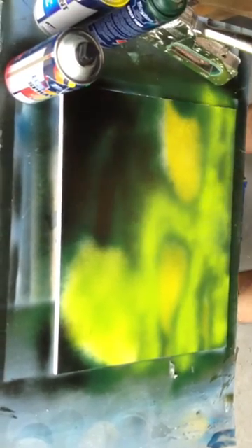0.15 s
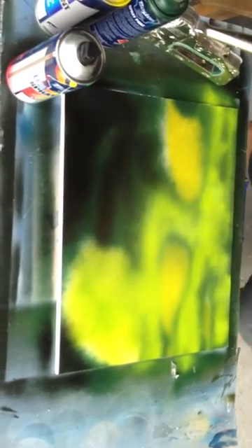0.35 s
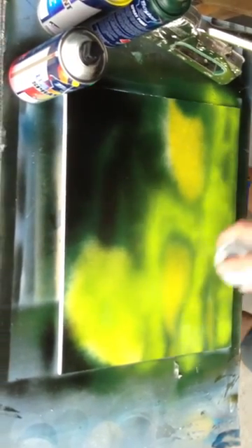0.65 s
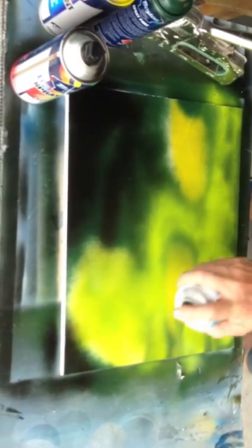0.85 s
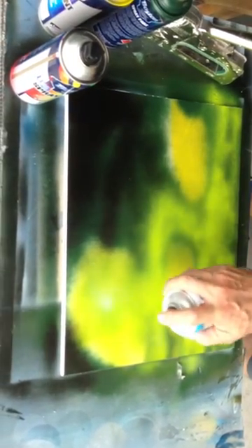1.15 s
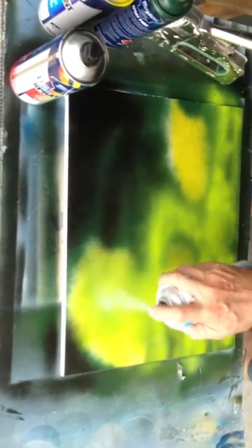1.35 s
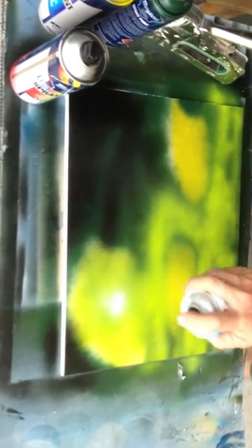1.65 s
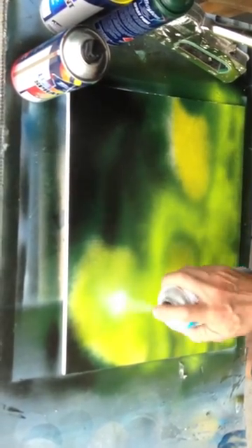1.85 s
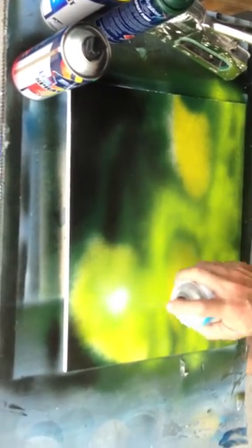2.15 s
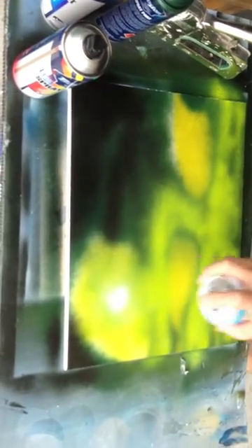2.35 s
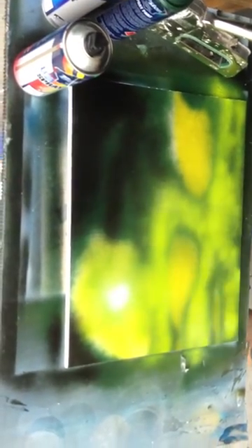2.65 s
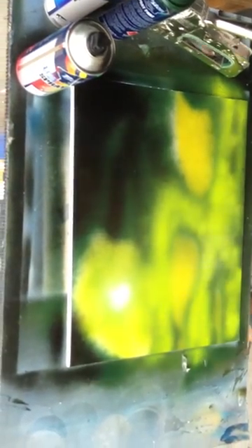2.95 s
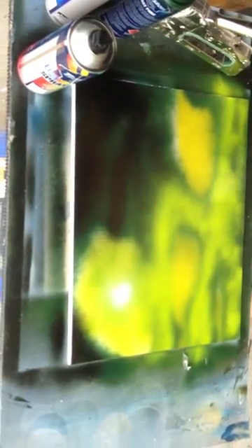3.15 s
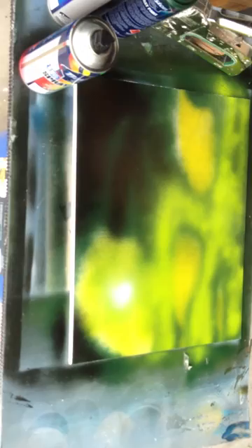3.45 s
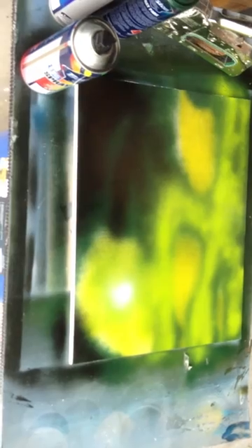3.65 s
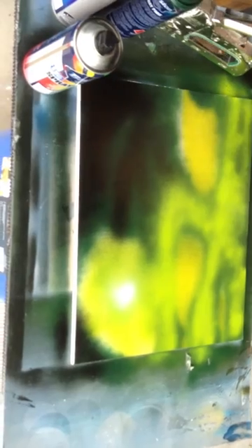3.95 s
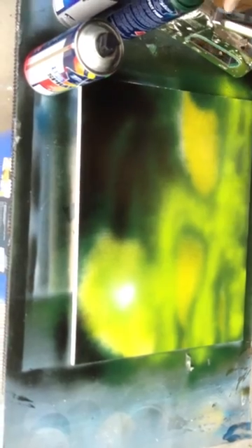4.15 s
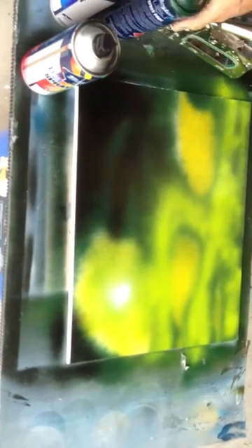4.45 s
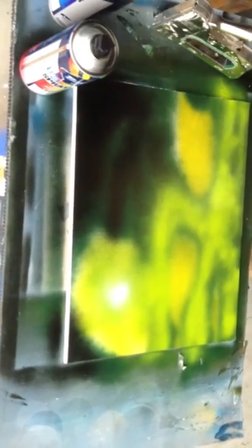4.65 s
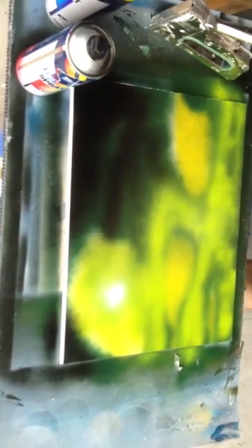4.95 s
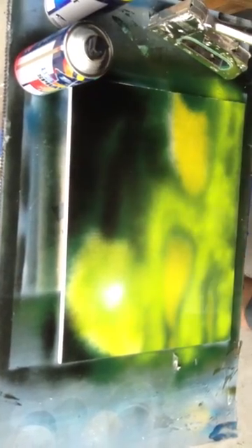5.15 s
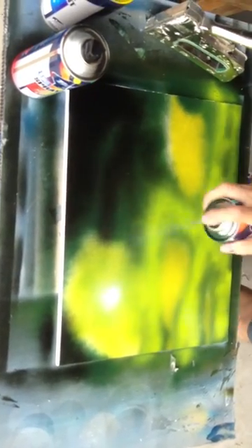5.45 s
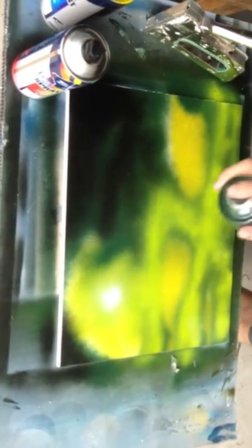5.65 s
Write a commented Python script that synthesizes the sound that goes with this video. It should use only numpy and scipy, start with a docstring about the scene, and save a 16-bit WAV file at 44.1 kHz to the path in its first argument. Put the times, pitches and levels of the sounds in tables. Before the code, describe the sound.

Metal cans clack and rattle, four faint short spray hisses follow, a can thumps onto a table, then more clacking and one stronger spray.

```python
"""Spray painting at a table

In a small room, close to the microphone, cans are picked up, swung and tapped: they clack as noise-struck
resonances with a ringing shell, rims clank and rub, and paint swishes as a fizz of noise grains.
The nozzle clicks in cap resonances and gives five short hisses of filtered, sputtering noise.
One can is put down with a thump of ringing board modes, the table bumps after it, and a can is picked up again."""
import sys
import numpy as np
from scipy import signal
from scipy.fft import rfft, irfft, next_fast_len
from scipy.io import wavfile
from scipy.ndimage import uniform_filter1d

SR = 44100
rng = np.random.default_rng(int(sys.argv[2]) if len(sys.argv) > 2 else 0)


def unload_audio(sound):
    """Save the sound as a 16-bit wav file, at the path given as the first command line argument."""
    columns = np.transpose(np.atleast_2d(sound))
    # keep every value between -1 and 1, then stretch to whole-number steps
    steps = np.round(np.clip(columns, -1, 1) * 32767)
    wavfile.write(sys.argv[1], SR, steps.astype(np.int16))


N = 256220
T = np.arange(N) / SR  # seconds
HIT_T = T[:SR // 2]  # the half second given to one blow

# Spray bursts. Each row: start in seconds, length in seconds, flow level in dB, cap resonance in dB over the flow,
# dB by which the finger eases off at both ends, time in seconds when a clot passes.
SPRAYS = [(0.989, 0.14, -44, -6, 19, 1.1), (1.348, 0.18, -40.5, -3, 12.5, 1.422),
          (1.773, 0.22, -40.5, -6, 19, 1.888), (2.176, 0.16, -44.5, -6.5, 1.5, 2.2),
          (5.459, 0.15, -31, -4, 8, 5.487)]


def undb(db):
    """Decibels to gain."""
    return 10 ** (np.asarray(db) / 20)


def unit(x):
    """Scale to rms 1."""
    return x / np.sqrt(np.mean(x ** 2))


def unit_hit(x):
    """Scale a blow so that its loudest 3 ms have rms 1."""
    return x / np.sqrt(uniform_filter1d(x ** 2, size=132).max())


def add(track, s, x):
    """Mix a sound into the track at time s."""
    start = int(s * SR)
    track[start:start + len(x)] += x[:N - start]


def lowpass(x, hz):
    """Take off the treble above a corner, 12 dB per octave."""
    return signal.sosfilt(signal.butter(2, hz, fs=SR, output="sos"), x)


def colour(x, points):
    """Causal minimum-phase filter with a (Hz, dB) response."""
    size = 2 * next_fast_len(len(x) // 2 + 2048, True)
    hz, db = np.transpose(points)
    bin_hz = np.arange(size // 2 + 1) * SR / size
    log_gain = np.log(undb(np.interp(np.log(bin_hz + 1), np.log(hz), db)))
    # folding the cepstrum onto positive time makes the filter causal
    cepstrum = irfft(log_gain)
    cepstrum[1:size // 2] *= 2
    cepstrum[size // 2 + 1:] = 0
    response = np.exp(rfft(cepstrum))
    return irfft(rfft(x, size) * response)[:len(x)]


def resonate(x, modes):
    """Parallel resonances (Hz, width in Hz, dB) of alternating sign."""
    out = 0
    for k, (hz, width, db) in enumerate(modes):
        b, a = signal.iirpeak(hz, hz / width, SR)
        out = out + (-1) ** k * undb(db) * signal.lfilter(b, a, x)
    return out


def ring(modes):
    """Free ringing of (Hz, dB, t60 in s) modes; each blow weights and detunes them anew."""
    hz, db, t60 = np.transpose(modes)[:, :, None]
    weight, detune = rng.standard_normal((2, len(modes), 1))
    phase = (2 * np.pi * hz * (1 + .003 * detune) * HIT_T).astype(np.float32)
    decay = np.exp(-np.log(1000) / t60 * HIT_T)
    return unit_hit(np.sum(undb(db + 1.5 * weight) * np.sin(phase) * decay, axis=0))


def walk(rate):
    """Smooth random wander with a spread near 1, through a new value `rate` times a second."""
    knots = rng.standard_normal(4096)
    return np.interp(T * rate, np.arange(len(knots)), knots)


def contact(decay_s, scatter_db, scatter_s):
    """A hard contact chatters for a moment, then scatters off the things nearby."""
    t = HIT_T[:8192]
    envelope = np.exp(-t / decay_s) + undb(scatter_db) * np.exp(-t / scatter_s)
    return rng.standard_normal(len(t)) * envelope


def air():
    """Quiet, even room noise."""
    # Spectrum of the room noise. Each row: frequency in Hz, relative dB per Hz.
    air_spectrum = [(60, -7), (140, -5.5), (260, -8.5), (490, -11), (900, -11.5), (1300, -16),
                    (2700, -15.5), (5000, -27), (7400, -25.5), (15500, -34)]
    return unit(colour(rng.standard_normal(N), air_spectrum)) * undb(-61)


def motion():
    """How briskly the can moves: each swing builds up, holds and dies away."""
    # Swings of a can, as paint washes about and the hand slides over it.
    # Each row: start of the hold in seconds, hold in seconds, level in dB.
    swing_rows = [(0.28, 0.2, -50), (0.632, 0.17, -45.5), (2.486, 0.31, -67.5), (2.932, 0.0093, -47),
                  (3.174, 0.23, -53), (3.439, 0.045, -45), (4.03, 0.18, -65.5), (4.403, 0.2, -77.5),
                  (5.035, 0.18, -53), (5.259, 0.2, -41)]
    rise_db_per_s, fall_db_per_s = 134.5, 82
    swings = []
    for s, hold, db in swing_rows:
        rise = rise_db_per_s * np.maximum(s - T, 0)
        fall = fall_db_per_s * np.maximum(T - s - hold, 0)
        swings.append(db - rise - fall)
    return undb(np.max(swings, axis=0))


def rolling(moving):
    """The rolling ball's light random clacks, whose level follows the motion of the can."""
    per_s, over_motion_db, centre_hz, tick_db = 14, 4.5, 2030, -5
    chance = rng.random((100, 3))
    times = np.cumsum(0.5 + chance[:, 0]) / per_s
    moving_db = 20 * np.log10(np.interp(times, T, moving))
    levels = moving_db + over_motion_db + 6 * (chance[:, 1] - .5)
    resonances = centre_hz * 2 ** (.5 * (chance[:, 2] - .5))
    heard = (levels > -58) & (times < T[-1])
    return [(s, db, hz, tick_db) for s, db, hz in zip(times[heard], levels[heard], resonances[heard])]


def shaded(x, s):
    """Dull the top of a clack that sounds while a can is put away, off to the side."""
    away_from_s, away_to_s, away_hz = 2.6, 3.6, 10500
    if away_from_s < s < away_to_s:
        return lowpass(x, away_hz)
    return x


def clacks(moving):
    """Ball, can or fingers tap a can wall; paint damps most of the ring and shifts the main resonance."""
    # Clacks of the cans: the ball on the wall, a can tapped by another can or by fingers.
    # Each row: start in seconds, level in dB before the trims below, wall resonance in Hz,
    # bright tick in dB relative to the wall.
    clack_rows = [ (0.1245, -33, 1800, -6.5), (0.1553, -30, 1680, 0.5), (0.2087, -26.5, 1720, -8.5),
                  (0.2278, -25.5, 1720, -12), (0.3112, -25.5, 2160, -10), (0.33, -27, 2130, -20),
                  (0.3762, -12.5, 2470, -9.5), (0.3835, -17, 2540, -1), (0.3866, -19.5, 2300, -17),
                  (0.4067, -26, 2300, -20), (0.4313, -23, 2290, -6), (0.597, -33.5, 2450, -11),
                  (0.6276, -27.5, 1580, -7.5), (0.7123, -27, 2410, -8.5), (0.7644, -27.5, 1600, -14.5),
                  (2.7441, -18.5, 2410, -4.5), (2.7609, -16, 2300, 1), (2.8486, -22.5, 2450, -7.5),
                  (2.882, -25, 1980, -11), (2.9524, -29, 1970, -12), (2.9764, -31.5, 2230, -7),
                  (3.058, -37.5, 1950, -6), (3.0929, -33, 2470, 0), (3.1683, -28, 2290, -4.5),
                  (3.265, -31.5, 1970, -9.5), (3.3092, -18.5, 1510, -12), (4.3983, -51, 2350, -9),
                  (4.907, -31.5, 1460, -8), (4.918, -19.5, 2170, -12), (4.9853, -14, 2820, -11),
                  (5.0032, -20, 3080, -11.5), (5.0543, -28, 2240, -12), (5.102, -17.5, 2200, -9),
                  (5.161, -26, 1740, -10), (5.173, -31, 1800, -23), (5.2199, -28.5, 1960, -10),
                  (5.2485, -25.5, 1904, -22), (5.2588, -19, 2160, -9.5)]
    # Damped modes of a filled can: low knock, wall, bright tick. Each row: frequency in Hz, width in Hz, level in dB.
    low_modes = [(467, 630, -8), (1000, 210, 3)]
    wall_modes = [(1609, 340, 2), (2294, 530, 1.5), (3036, 150, 1.5), (3480, 280, -3), (4140, 510, -9)]
    tick_modes = [(6190, 1950, -5), (6600, 950, 1), (7800, 1100, -3.5), (11700, 1100, -9.5),
                  (13800, 4800, -14)]
    # Lasting modes of the steel shell. Each row: frequency in Hz, mean level in dB, t60 in seconds.
    shell_modes = [(1808, -2, 0.4), (1926, -3, 0.22), (2186, -7, 0.51), (2550, -9, 0.14), (3100, -11.5, .3),
                   (3480, -13, 0.27), (4580, -14.5, 0.24), (7070, -5, 0.23), (7250, -10.5, .2),
                   (8050, -1, 0.074)]
    # Shell ring after a clack, which a firm grip damps. Each row: time in seconds, level in dB before the trim below.
    shell_ring = [(0.16, 18), (0.4, 8), (0.7, 2), (2.75, 17), (3.0, 10.5), (4.92, -7), (5.26, -7)]
    # a blow on the soft side wall stirs low knock and all wall modes; on the stiff rim one resonance is left
    knock_db, other_walls_db = -16.5, -3
    rim_hz, rim_db_per_octave = 2414, 81
    near, far = np.zeros((2, N))
    for s, db, hz, tick_db in list(clack_rows) + rolling(moving):
        rim_db = rim_db_per_octave * max(np.log2(hz / rim_hz), 0)
        ring_db = np.interp(s, *np.transpose(shell_ring))
        # faint clacks are farther away, so more of them is room
        room_db = 2 - 0.12 * (db + 29.5)
        push = contact(decay_s=0.0028, scatter_db=-25.5, scatter_s=.014)
        main = unit_hit(resonate(resonate(push, [(hz, 420, 0)]), [(hz, 800, 0)]))
        others = unit_hit(resonate(contact(0.0058, -18.5, .018), wall_modes))
        wall = unit_hit(main + undb(other_walls_db - rim_db) * others)
        low = unit_hit(lowpass(resonate(contact(0.0023, -21.0, 0.0033), low_modes), 1400))
        tick = unit_hit(resonate(contact(0.0034, -12.5, 0.029), tick_modes))
        mix = wall + undb(knock_db - rim_db) * low + undb(tick_db) * tick
        hit = shaded(undb(db - 4.5) * mix, s)
        add(near, s, hit)
        add(near, s, undb(db + ring_db - 33.0) * ring(shell_modes))
        add(far, s, undb(room_db) * hit)
    return near, far


def clanks():
    """Rim meets rim: a bright crack, then the crowded modes of two steel shells chatter and die away."""
    # Can striking can. Each row: start in seconds, level in dB, ring in dB relative to the crack.
    clank_rows = [(0.2374, -11, -12.5), (0.2697, -21.5, -12), (0.2939, -22.5, -25)]
    # Colour of the clank. Each row: frequency in Hz, relative dB per Hz.
    steel = [(400, -31), (1000, -22.5), (1300, -28.5), (1750, 0.5), (2200, -6), (3300, 2), (4300, -4.5),
             (5300, -7), (6300, -6.5), (8000, -10), (10500, -18.5), (14500, -14)]
    out = np.zeros(N)
    for s, db, ring_db in clank_rows:
        crack = np.exp(-HIT_T / 0.0048)
        chatter_db = 1.6 * walk(220)[:len(HIT_T)]
        shells = undb(ring_db + chatter_db) * np.exp(-HIT_T / 0.046)
        noise = rng.standard_normal(len(HIT_T))
        add(out, s, undb(db) * unit_hit(colour(noise * (crack + shells), steel)))
    return out


def swish(moving):
    """Washing paint and sliding skin: a dense fizz of tiny impacts on the can wall."""
    # Spectrum of the fizz. Each row: frequency in Hz, relative dB per Hz.
    fizz = [(120, -46.5), (200, -35), (278, -12.5), (446, -8.5), (641, -15), (992, -6), (1230, -10),
            (1650, -3), (2290, -2), (2470, -1), (3300, -6), (4920, -20.5), (7090, -16.5), (14400, -30),
            (15500, -37.5)]
    grains = rng.standard_normal(N) * undb(2.4 * rng.standard_normal(N))
    return moving * unit(colour(grains, fizz)) * undb(1.7 * walk(90))


def rubs():
    """Steel sticks and slips on steel; the dense slips feed one resonance of the shell."""
    # A rim rubs and sings briefly. Each row: start and length in seconds, pitch and width in Hz, level in dB.
    rub_rows = [(0.321, 0.058, 2100, 200, -40.5), (2.768, 0.038, 1774, 90, -32.5),
                (3.996, 0.28, 4120, 450, -74.5), (4.846, 0.028, 685, 615, -59),
                (4.927, 0.065, 2200, 255, -50), (4.992, 0.087, 4050, 500, -48.5)]
    out = np.zeros(N)
    for s, length, hz, width, db in rub_rows:
        slips = rng.standard_normal(len(HIT_T[:int(length * SR)]))
        song = resonate(resonate(slips, [(hz, width, 0)]), [(hz, 2 * width, 0)])
        add(out, s, undb(db) * unit(song * signal.windows.tukey(len(slips), .5)))
    return out


def nozzle():
    """The plastic cap ticks as the valve is pressed and let go."""
    # Clicks of the nozzle under the finger. Each row: start in seconds, level in dB before a common 4 dB cut,
    # bright tick in dB relative to the cap.
    clicks = [(1.0096, -31, 0), (1.1545, -33, -1), (1.4753, -36.5, 2), (1.5313, -46, 2.5),
              (1.6097, -46.5, -23), (1.6663, -37.5, -4), (1.8552, -39.5, 8), (2.0425, -44.5, 2.5),
              (2.0527, -53, 6), (2.1916, -44, 10.5), (5.6431, -38, -1)]
    # Bright modes of the cap. Each row: frequency in Hz, width in Hz, level in dB.
    tick_modes = [(5890, 1100, 17.5), (6900, 1940, 18), (12400, 4900, -8)]
    cap_hz, cap_spread = 2510, 0.085  # the spread is a share of the pitch, drawn anew for each click
    # the valve also ticks as each burst starts
    presses = [(burst[0], -47.5, -16) for burst in SPRAYS]
    out = np.zeros(N)
    for s, db, tick_db in list(clicks) + presses:
        hz = cap_hz * (1 + cap_spread * rng.standard_normal())
        push = contact(decay_s=0.0018, scatter_db=-47.5, scatter_s=0.0071)
        cap = unit_hit(resonate(push, [(hz, 550, 0), (1700, 400, -9)]))
        tick = unit_hit(resonate(push, tick_modes))
        add(out, s, undb(db - 4) * (cap + undb(tick_db) * tick))
    return out


def valve_opening(start, length, ease_db):
    """The valve snaps open, follows the arch of the finger's pressure and closes."""
    open_s, close_s, flatness = 0.0056, 0.013, 3.3
    t = np.maximum(T - start, 0)
    off_centre = np.abs(2 * np.minimum(t / length, 1) - 1)
    arch = undb(-ease_db * off_centre ** flatness)
    return (1 - np.exp(-t / open_s)) * arch * np.exp(-np.maximum(t - length, 0) / close_s)


def spray():
    """The jet hisses high up and rushes on the paper; sputtering paint sounds the resonances of the cap."""
    # Spectrum of the jet. Each row: frequency in Hz, relative dB per Hz.
    jet_spectrum = [(2060, -49), (3500, -14), (4870, -26.5), (5830, -15), (6320, -10), (7160, -11),
                    (7960, -7.5), (8850, -9), (10300, -14.5), (11900, -10.5), (13900, -1.5), (14800, -8),
                    (15500, 0)]
    clot_db, clot_width_s = 8, 0.017  # a clot of paint makes the cap sputter harder for a moment
    sputter_power = 0.79  # sputter grows more slowly than the flow, so a half-open valve spits more
    flow, sputter = np.zeros((2, N))
    for start, length, db, cap_db, ease_db, clot_s in SPRAYS:
        opening = valve_opening(start, length, ease_db)
        clot = np.exp(-((T - clot_s) / clot_width_s) ** 2)
        flow += undb(db) * opening
        sputter += undb(db + cap_db + clot_db * clot) * opening ** sputter_power
    jet = unit(colour(rng.standard_normal(N), jet_spectrum)) * undb(2.5 + 1.35 * walk(140))
    cap = resonate(rng.standard_normal(N), [(1684, 170, -2.5), (2423, 144, 3.0), (2830, 130, -0.5)])
    cap = unit(resonate(cap, [(2570, 1900, 0)])) * undb(-7.0 + 1.9 * walk(180))
    paper = unit(resonate(rng.standard_normal(N), [(970, 480, 0)]))
    return flow * (jet + undb(-26.5) * paper) + sputter * cap


def rocking(count):
    """The table rocks to rest: each dull bump comes sooner and weaker than the one before."""
    first_s, gap_s, gap_ratio = 3.714, 0.059, 0.78
    first_db, fade_db, bright_db = -40, 3, -28
    gaps = gap_s * gap_ratio ** np.arange(count)
    return [(first_s + gaps[:k].sum(), first_db - k * fade_db, bright_db) for k in range(count)]


def thumps():
    """A can leaves or meets the table: a short thud, a rattle of loose things; a duller one rings the board more."""
    # Thumps and dull knocks as cans are put down and picked up.
    # Each row: start in seconds, thud level in dB, brightness in dB per decade around 270 Hz.
    thump_rows = [(3.309, -19, 8.5), (3.3123, -17.5, -14.5), (3.347, -27.5, 1), (3.372, -25.5, 8),
                  (3.499, -36.5, -24.5), (3.658, -40.5, -26), (4.455, -54, -11.5), (4.83, -40.5, 26.5)]
    # Spectrum of the thud before that tilt. Each row: frequency in Hz, relative dB per Hz.
    thud = [(60, -34), (120, -15), (190, -3), (270, 2), (350, -1), (440, -1.5), (540, -10), (720, -8.5),
            (1000, -20), (1600, -49), (3000, -60)]
    # Modes of the table top. Each row: frequency in Hz, mean level in dB, t60 in seconds.
    board_modes = [(140, 0.5, 0.84), (198, -2, 0.25), (264.4, -7, 0.38), (344, -1.5, 0.52),
                   (454, -6.5, 0.57), (554, -9, 0.44), (860, -21, 0.38)]
    out = np.zeros(N)
    for s, db, bright_db in list(thump_rows) + rocking(count=5):
        tilted = [(hz, d + bright_db * np.log10(hz / 270)) for hz, d in thud]
        rattle = undb(-29.0) * rng.standard_normal(len(HIT_T)) * np.exp(-HIT_T / 0.016)
        push = signal.unit_impulse(len(HIT_T)) + rattle
        # the board swings a few times under the weight of the can
        push = push + undb(-1.5) * resonate(push, [(289.6, 55, 0.007)])
        add(out, s, undb(db) * unit_hit(colour(push, tilted)))
        add(out, s, undb(db - 13.0 - 0.09 * bright_db) * ring(board_modes))
    return out


def room(x):
    """Diffuse reflections that build up quickly and decay at a different pace in each band."""
    # Room decay. Each row: band centre in Hz, t60 in seconds, relative level in dB.
    decay_bands = [(200, 1, -8.5), (860, 0.38, 8.5), (2380, 0.57, -3), (4600, 0.57, 0), (8280, 0.55, -2),
                   (14220, 0.33, 2.5)]
    t = T[:SR]
    hz, t60, db = np.transpose(decay_bands)
    noise = rfft(rng.standard_normal(SR))
    log_hz = np.log(np.arange(SR // 2 + 1) + 1)
    tail = 0
    for k, share in enumerate(np.eye(len(hz))):
        # neighbouring bands cross-fade along log frequency
        band = irfft(noise * np.interp(log_hz, np.log(hz), share))
        tail = tail + band * undb(db[k]) * np.exp(-np.log(1000) * t / t60[k])
    tail = tail * (1 - np.exp(-t / 0.0025))
    return signal.fftconvolve(x, tail / np.sqrt(np.sum(tail ** 2)))[:N]


def scene():
    """All sources near the microphone, with the room behind them."""
    moving = motion()
    floor = air()
    cans, cans_far = clacks(moving)
    rims = clanks() + rubs()
    wash, valve, hiss, table = swish(moving), nozzle(), spray(), thumps()
    send = undb(-9.0) * cans_far + undb(-8) * (rims + valve + table) + undb(-11.0) * hiss
    return (cans + rims + valve + hiss + table + wash + room(send) + floor)[None]


def record(dry):
    """The microphone loses the deep bass and the very top."""
    bass_cut = signal.butter(6, 118, "high", fs=SR, output="sos")
    top_cut = signal.ellip(10, .2, 70, 15250, fs=SR, output="sos")
    return signal.sosfilt(top_cut, signal.sosfilt(bass_cut, dry))


dry = scene()
out = record(dry)
unload_audio(out)
```